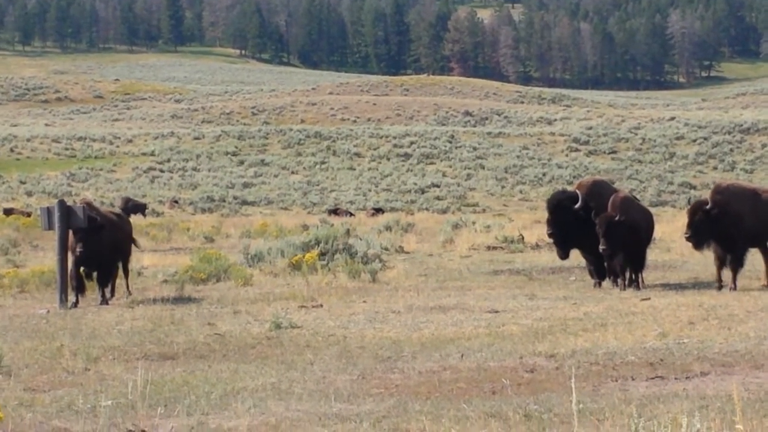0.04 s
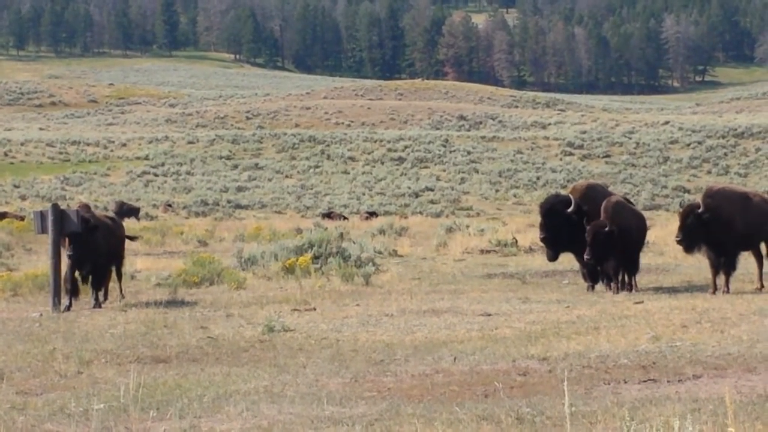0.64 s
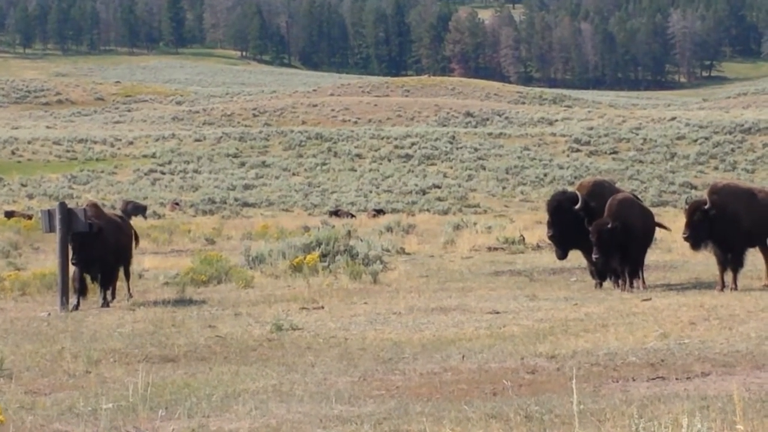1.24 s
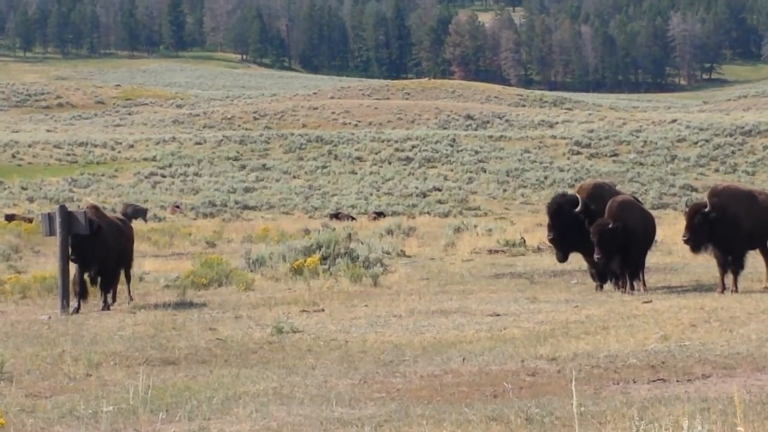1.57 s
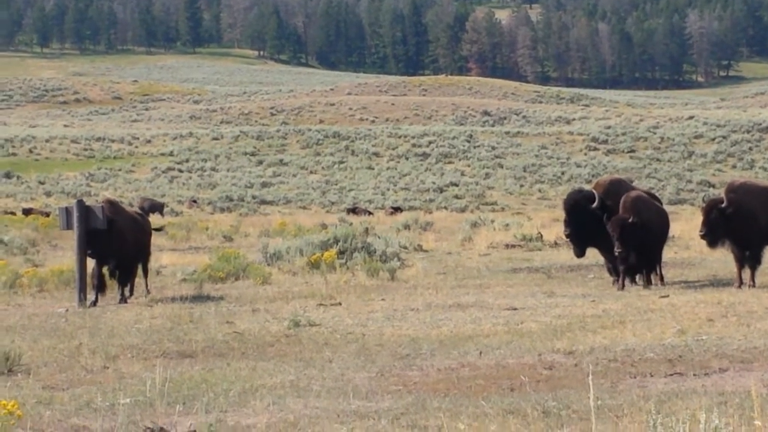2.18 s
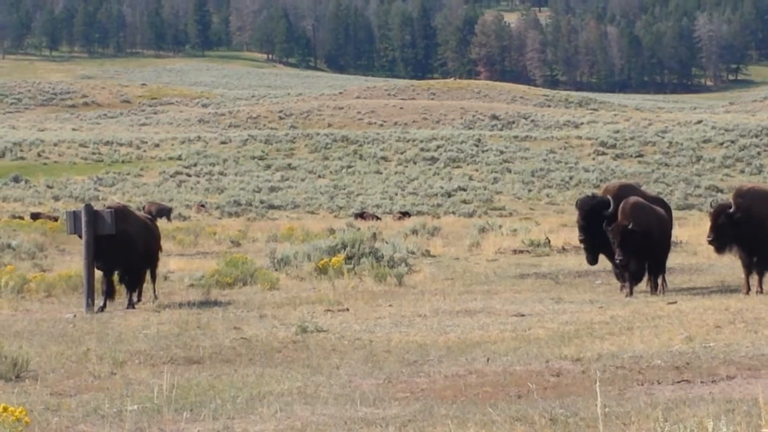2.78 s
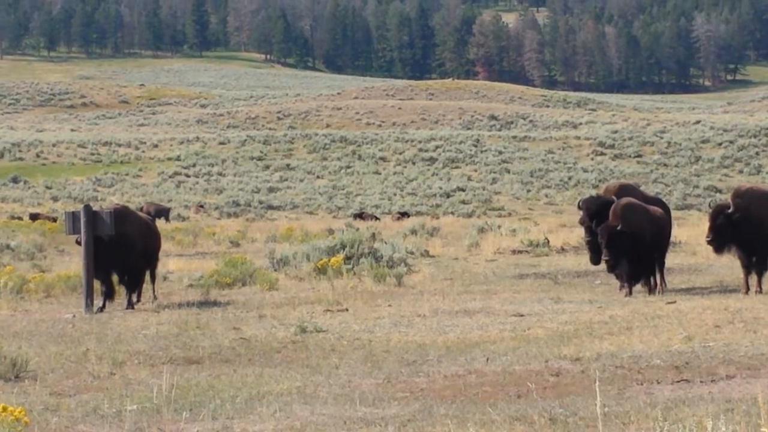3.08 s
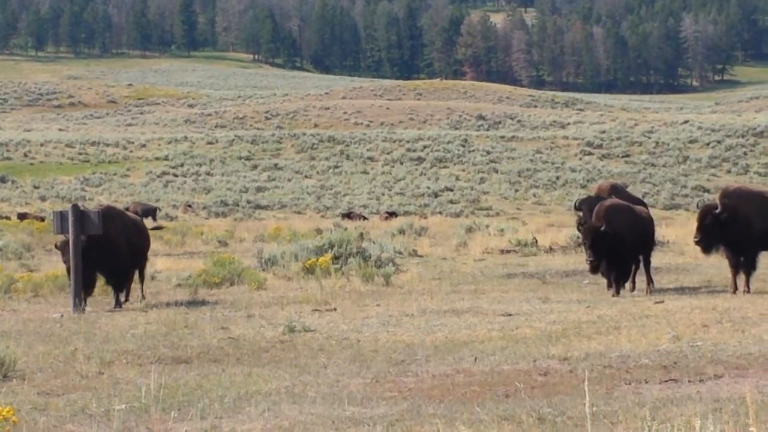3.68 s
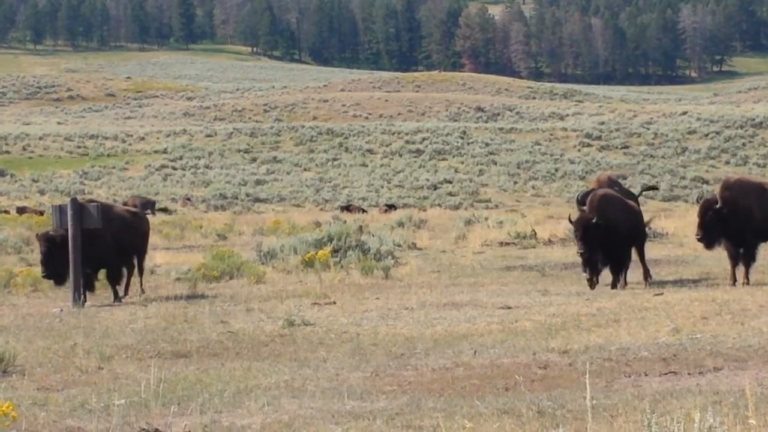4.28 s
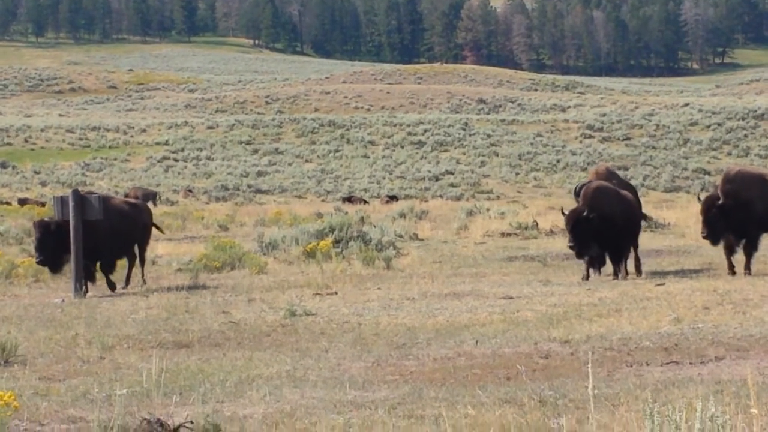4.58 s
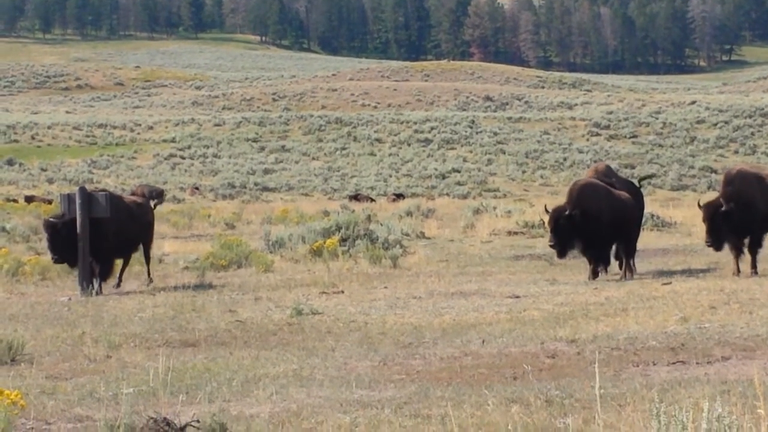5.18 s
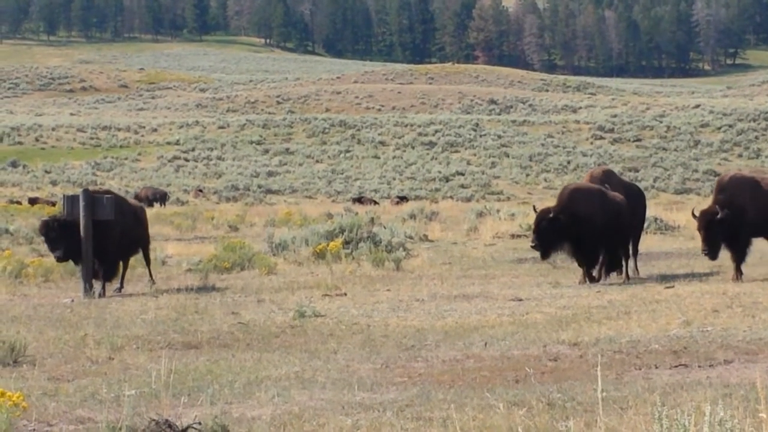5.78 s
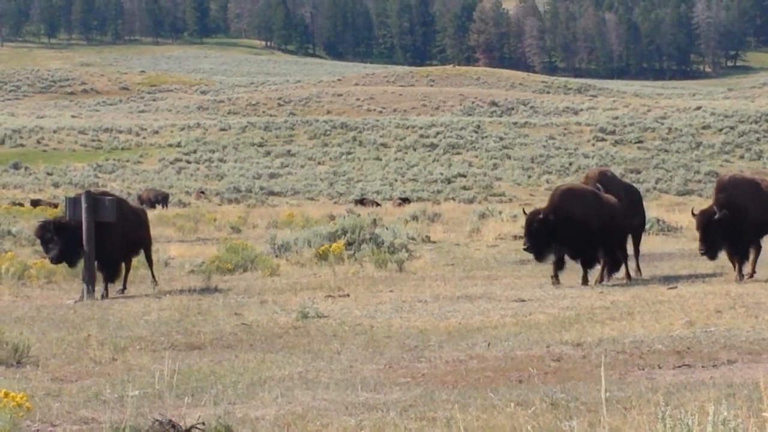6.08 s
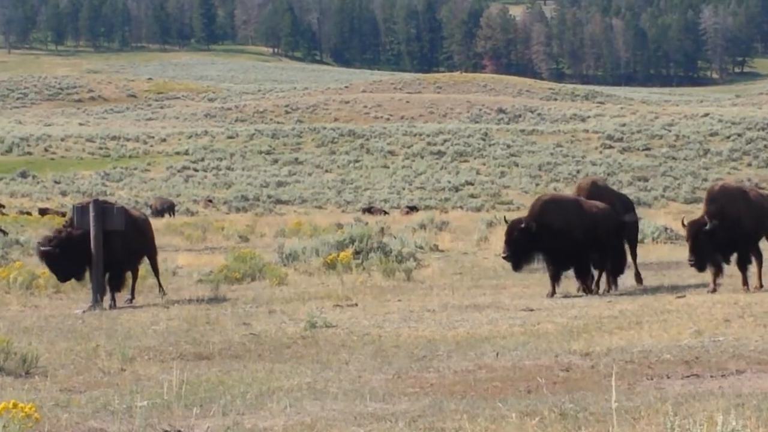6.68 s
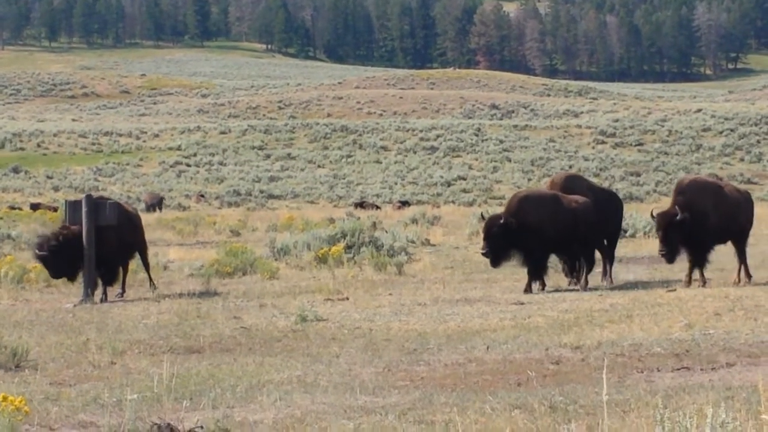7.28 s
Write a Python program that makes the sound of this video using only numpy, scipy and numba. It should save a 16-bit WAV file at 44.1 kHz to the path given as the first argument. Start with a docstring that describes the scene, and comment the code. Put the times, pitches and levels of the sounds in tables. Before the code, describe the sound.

Three hoarse, throaty bison bellows sound outdoors, with faint herd grumbles, small clicks and knocks, and a low rumble of air between them.

```python
"""Bison bulls bellow three times on an open plain, rough and rattling: their vocal folds slap shut
slowly, and each slap makes a long throat and the mouth ring. Wet clacks run through the second bellow.
A softer growl trails the first one, and the far herd grumbles in the pauses.
Dry ticks, dull knocks, one sharp snap and a short rustle sound close by,
over a faint rumble of air and the hiss and thin whine of a camera."""
import sys
import numpy as np
from scipy import signal
from scipy.fft import rfft, irfft
from scipy.io import wavfile
from scipy.ndimage import uniform_filter1d
from numba import njit

SR = 44100
rng = np.random.default_rng(int(sys.argv[2]) if len(sys.argv) > 2 else 0)


def materialize(psi):
    """Save the field psi as 16-bit PCM at rate SR to the path in sys.argv[1].

    A 1-D psi becomes a single channel; in a 2-D psi each row is a channel.
    """
    bounded = np.clip(np.atleast_2d(psi).T, -1, 1)
    quanta = np.round(bounded * 32767).astype(np.int16)
    wavfile.write(sys.argv[1], SR, quanta)


N = 328104
T = np.arange(N) / SR

# the bellows: start t/s, hardest strain t/s, end t/s, fade-in t/s, level/dB,
# throat note f/Hz (at the start, at the hardest strain, at the end),
# mouth level/dB (at first, once settled), rasp level/dB (at first, once settled)
BELLOWS = [(-0.015, 0.225, 0.59, 0.056, -37, 154, 192, 162, -22, -19.5, -34.5, -21.5),
           (2.712, 2.96, 3.306, 0.078, -29.5, 176, 215, 135.5, -19.5, -12, -27, -22),
           (5.524, 6.235, 6.9, 0.12, -26, 188, 216.7, 134, -4, -19, -40.5, -32.5)]
# how often the vocal folds slap, one list per bellow: t/s, f/Hz
SLAP_RATES = [
    [(0.024, 25), (0.064, 28.13), (0.205, 22.6), (0.56, 15.8)],
    [(2.712, 26.4), (2.833, 32.89), (2.966, 24.7), (3.3, 20.32)],
    [(5.524, 28.8), (5.661, 39.35), (5.981, 27.4), (6.283, 29.7), (6.494, 26.7), (6.9, 27.6)],
]
# notes the mouth rings at in each bellow: f/Hz, width/Hz, level/dB
FIRST_MOUTH = [(523, 32, 2.5), (696, 75, -5), (1010, 250, -5), (1176, 68, 0.5)]
SECOND_MOUTH = [(500, 60, -17), (638, 42, 9.5), (1044, 210, 2.5), (1190, 320, -8)]
THIRD_MOUTH = [(490, 88, -6.5), (597, 36.5, 10.5), (780, 93, -12), (930, 87, -3.5), (1090, 77, -10.5),
               (1370, 53, -8)]
# tone colour (how strong each frequency is) of each bellow's rasp: f/Hz, level/dB
FIRST_RASP = [(600, -15), (1300, -0.5), (1520, -0.5), (1870, 0), (2400, -4), (3000, -13), (3550, -5.5),
              (3950, -2.5), (4700, -7), (5500, -13), (6300, -20), (7500, -15), (14000, -33)]
SECOND_RASP = [(600, -14), (1300, 3.5), (1750, 1.5), (2130, 3), (2450, -5), (2680, 2), (3200, -5),
               (4000, -5.5), (4480, -4), (5100, -6.5), (5500, -28), (6400, -12.5), (14000, -31)]
THIRD_RASP = [(600, -26), (1400, -9), (1620, -16), (2120, 4), (2400, -1), (2850, -1.5), (3450, -0.5),
              (3720, 0), (4100, -9), (4500, -5), (5400, -11), (6250, -13), (7200, -17), (14000, -40)]
# moments when a bull eases off: t/s, half length/s, level/dB
EASINGS = [(0.346, 0.056, -3), (6.037, 0.095, -3)]
# wet clacks in the throat: t/s, level/dB, f/Hz
CLACKS = [(2.750, -38.5, 1320), (2.786, -46, 1300), (2.895, -44, 2580), (3.033, -33, 2010),
          (3.076, -36, 2044), (3.119, -36.5, 2130), (3.143, -40, 2700), (3.163, -32.5, 2001),
          (3.187, -36, 2180), (3.207, -38.5, 2020), (3.255, -46.5, 2170), (3.283, -54, 2190)]
# pushes of breath in the soft growl and in the far herd: start t/s, end t/s, level/dB
GROWL_PUSHES = [(0.5, 1.05, -55), (0.98, 1.6, -54.5), (1.54, 2.36, -55), (2.36, 2.72, -67)]
HERD_PUSHES = [(3.25, 3.62, -66), (3.88, 4.3, -70.5), (4.42, 4.7, -70), (4.66, 4.95, -65), (5.0, 5.22, -72),
               (5.41, 5.7, -59), (6.82, 7.1, -67), (7.1, 7.5, -72.5)]
# note the growling throat rings at: t/s, f/Hz
GROWL_THROAT = [(0.6, 193), (1.2, 172), (1.6, 191), (1.85, 164), (2.08, 108), (2.3, 151)]
# tone colours of the growl and the herd: f/Hz, level/dB
GROWL_COLOUR = [(50, -17), (85, 3.5), (125, -0.5), (187, 1), (215, -0.5), (250, 0.5), (320, -14.5),
                (520, -10.5), (800, -15), (1400, -28.5), (2200, -33), (5000, -34)]
HERD_COLOUR = [(50, -37), (90, 5), (140, 8), (230, 5), (320, -16), (520, -6.5), (1000, -36), (3000, -45)]
# notes that the snap and the ticks ring at: f/Hz, width/Hz, level/dB
SNAP_NOTES = [(504.3, 28, 11), (1048, 120, 1), (1245, 22, 3), (1630, 70, 2.5), (2165, 99, 6),
              (3365, 86, 1.5), (3951.5, 214, 1), (4336, 230, -1), (5140, 130, -5.5), (6030, 320, -2)]
TICK_NOTES = [(1230, 360, -3), (1608, 220, -6), (1980, 310, -4), (3210, 400, -1), (3910, 220, 2.5),
              (4600, 600, -33), (6000, 700, -27)]
# dry ticks: t/s, level/dB, number of clicks
TICKS = [(.297, -44, 1), (.400, -42, 1), (.469, -40.5, 2), (.701, -48, 1), (.721, -48, 3), (.757, -46.5, 3),
         (.802, -45.5, 3), (.854, -48.5, 3), (.902, -49, 3), (1.604, -50, 3), (1.682, -51, 2),
         (1.728, -52, 1), (1.967, -47.5, 2), (2.101, -45.5, 2), (2.279, -54, 1), (3.721, -61.5, 2),
         (4.278, -55.5, 1), (4.318, -56.5, 3), (6.935, -56, 2)]
# dull knocks: t/s, level/dB
KNOCKS = [(.415, -39.5), (1.604, -50.5), (1.682, -53.5), (2.478, -53), (3.063, -34.5), (3.126, -41)]
# a dry rustle: start t/s, end t/s, level/dB
RUSTLE = (7.32, 7.47, -69)
# how much louder the left side is than the right: f/Hz, level/dB
LEFT_OVER_RIGHT = [(60, -0.5), (110, 0), (200, 1), (370, -2.5), (680, 0), (1240, 5), (2280, -12.5),
                   (4180, 9), (7660, -12), (14000, 2)]
# tone colours of the rumbling air and the hiss: f/Hz, level/dB
AIR_COLOUR = [(12, -41), (20, 7.5), (38, -6.5), (71, -3), (154, -6), (245, -6), (278, -19), (326, -15),
              (356, -29), (376, -17.5), (664, -25.5), (712, -9), (914, -30), (1400, -34), (1820, -59),
              (3080, -120)]
HISS_COLOUR = [(500, 11), (1200, 0.5), (2200, 2), (3500, -1), (5000, -0.5), (6300, 2.5), (8000, -2.5),
               (11000, -1), (14500, -4.5)]
# tones of the camera's whine: start t/s, end t/s, f/Hz, level/dB
WHINE_TONES = [(2.55, 4.42, 11267, -81), (2.55, 4.42, 9317, -85), (2.55, 4.42, 5631, -90),
               (.95, 2.55, 6947, -85), (.95, 2.55, 10657, -90), (4.42, 7.44, 6947, -91),
               (4.42, 7.44, 10657, -93)]


def bellow(row, slap_rates, mouth_notes, rasp_colour, throat_width_hz, flap_db, rattle_db, rebound_db,
           breath_db, wheeze_db, crackle_s, chest_db, rasp_follows):
    """The vocal folds slap shut some 25 times a second, bounce back and flap at random in between."""
    start, _, end = row[:3]
    gain, strain, throat_hz, mouth_db, rasp_db = effort(row)
    during = (T >= start) & (T <= end)
    rate_hz = np.interp(T, *np.transpose(slap_rates))
    cycles_so_far = np.cumsum(rate_hz * during) / SR + rate_hz[0] * max(-start, 0)
    cycles = np.arange(int(cycles_so_far[-1]) + 1)
    slap_luck, crack_luck, rebound_luck = rng.standard_normal((80, 3))[:len(cycles)].T
    slap_times = np.interp(cycles, cycles_so_far[during], T[during])
    rebound_times = np.interp(cycles + .53, cycles_so_far[during], T[during])
    slaps = impulses(slap_times, undb(1.04 * slap_luck))
    cracks = impulses(slap_times, undb(1.9 * crack_luck))
    rebounds = impulses(rebound_times, undb(rebound_db + 2.7 * rebound_luck))
    flaps = (rng.random(N) < 220 / SR) * noise() * during
    # the long throat booms after each slap
    push = slaps + undb(flap_db) * flaps + 0.2 * rebounds
    boom = resonate(push, throat_hz, float(throat_width_hz))
    boom = resonate(boom, throat_hz, 115.0) + 0.05 * boom
    boom = cut(cut(boom, 238, "low"), 75.0, "high", order=4)
    # the chest thuds lower, and throbs faintly at the slap rate itself
    thud = ring(push, [(105.8, 11.7, 0)])
    thud = cut(cut(thud, 69.4, "high", order=6), 90, "low", order=4)
    throb = cut(cut(slaps, 57, "low", order=6), 22, "high")
    chest = unit(thud, during) + 0.19 * unit(throb, during)
    # breath rushes hardest just after each slap
    breath = noise() * (0.5 + fade(slaps, 0.015)) * np.sqrt(rate_hz / SR)
    # the mouth's notes follow the throat a little and never hold quite still
    stretch = (throat_hz / throat_hz[during].mean()) ** 0.13 * (1 + 0.025 * wander(18))
    rattle = cracks + undb(rattle_db) * flaps + rebounds + undb(breath_db) * breath
    mouth = ring(rattle, mouth_notes, stretch)
    mouth = cut(cut(mouth, 395, "high", order=3), 950, "low", order=4)
    # wet tissue crackles each time the folds close
    bursts = fade(cracks + rebounds + 0.17 * np.abs(flaps), crackle_s)
    crackle = noise() * fade(bursts, 0.00068)
    rasp = colour(unit(crackle, during) + undb(wheeze_db) * unit(breath, during), rasp_colour)
    rasp = undb(rasp_db) * unit(rasp, during) * strain ** rasp_follows
    voice = (steady(boom, 0.035) + undb(mouth_db) * steady(mouth, 0.12)) * easing()
    return (voice * strain + rasp + undb(chest_db) * chest) * gain


def effort(row, strain_db_per_hz=0.16, mouth_open_s=0.11, mouth_settle_s=0.27):
    """The harder the bull strains, the higher and louder its throat rings; its mouth opens and settles."""
    start, peak, end, attack_s, db, start_hz, peak_hz, end_hz = row[:8]
    mouth_start_db, mouth_settled_db, rasp_start_db, rasp_settled_db = row[8:]
    gain = undb(db) * envelope(start, end, attack_s, release_s=0.12, depth_db=19.5)
    slack = np.interp(T, [start, peak, end], [1, 0, 1]) ** 1.3  # the power rounds off the turn
    sag_hz = slack * (peak_hz - np.where(T < peak, start_hz, end_hz))
    strain = undb(-strain_db_per_hz * sag_hz)
    unsettled = np.exp(-np.maximum(T - start, 0) / mouth_settle_s)
    shut_db = np.interp(T, [start, start + mouth_open_s], [-12, 0])
    mouth_db = mouth_settled_db + unsettled * (mouth_start_db - mouth_settled_db) + shut_db
    rasp_db = rasp_settled_db + unsettled * (rasp_start_db - rasp_settled_db)
    return gain, strain, peak_hz - sag_hz, mouth_db, rasp_db


def easing():
    """The voice dips smoothly wherever a bull eases off."""
    return undb(sum(db * np.exp(-((T - s) / half_s) ** 2) for s, half_s, db in EASINGS))


def clacks(width_hz=190):
    """Wet tissue parts with a pop that rings briefly in the mouth."""
    sound = 0
    for s, db, hz in CLACKS:
        parting = ring(impulses([s], 1.), [(hz, 900, 0)])
        pop = ring(parting, [(hz, width_hz, 0), (hz / 2, width_hz, 2)])
        sound = sound + undb(db) * pop / np.abs(pop).max()
    return sound


def grumble(pushes, tone_colour, throat_hz, rate_hz, unevenness, breath_db, throat_width_hz, leak,
            attack_s, release_s, sag_db_per_s):
    """Soft, uneven slaps ring a throat, blurred by distance; each push swells, sags and dies away."""
    gain = 0
    for start, end, db in pushes:
        sagging = undb(db - sag_db_per_s * np.maximum(T - start, 0))
        gain = np.maximum(gain, sagging * envelope(start, end, attack_s, release_s, depth_db=7.5))
    gap_luck, size_luck = rng.standard_normal((400, 2)).T
    times = np.cumsum(np.exp(unevenness * gap_luck) / rate_hz)
    in_scene = times < T[-1]
    slaps = impulses(times[in_scene], undb(2 * size_luck[in_scene]))
    breath = noise() * fade(slaps, 0.043)
    source = unit(slaps) + undb(breath_db) * unit(breath)
    throat = resonate(source, throat_hz * np.ones(N), float(throat_width_hz)) + leak * source
    return steady(colour(throat, tone_colour), 0.081) * gain


def snap(at_s=6.6762, level_db=-22.5, sweep_s=0.0038):
    """A sharp snap that chirps downward, because its high notes start first."""
    sound = 0
    for hz, width, db in SNAP_NOTES:
        lag_s = sweep_s * max(1 - hz / 6500, 0)
        sound = sound + ring(impulses([at_s + lag_s], 1.), [(hz, width, db)])
    sound = cut(sound, 7130, "low", order=8)
    return sound / np.abs(sound).max() * undb(level_db)


def ticks(length=600):
    """Dry clicks, alone or in quick groups that get weaker; every click has its own pitch."""
    sound = np.zeros(N + SR)
    for s, db, count in TICKS:
        gaps_s = rng.uniform(0.005, 0.011, 4)
        stretches = np.exp(0.031 * rng.standard_normal(4))
        scrapes = rng.standard_normal((4, length)) * np.exp(-T[:length] / 0.0014)
        for k in range(count):
            click = ring(signal.unit_impulse(length) + 0.2 * scrapes[k], TICK_NOTES, stretches[k])
            start = int((s + gaps_s[:k].sum()) * SR)
            sound[start:start + length] += undb(db - 2.7 * k) * click / np.abs(click).max()
    return sound[:N]


def knocks():
    """Soft bumps make something hollow ring."""
    times, db = np.transpose(KNOCKS)
    hollow = ring(signal.unit_impulse(3000), [(499, 64, -7), (708, 40, -16.5)])
    hollow = cut(hollow, 510, "low")
    return signal.fftconvolve(impulses(times, undb(db)), hollow / np.abs(hollow).max())[:N]


def rustle(clicks_per_s=900):
    """A crowd of tiny clicks that ring mostly on one bright note."""
    start, end, db = RUSTLE
    clicks = (rng.random(N) < clicks_per_s / SR) * noise()
    gain = undb(db) * envelope(start, end, attack_s=0.023, release_s=0.043, depth_db=20)
    return unit(ring(clicks, TICK_NOTES) + ring(clicks, [(3880, 190, 11)])) * gain


def surroundings(x):
    """Nearby surfaces scatter the highs differently to each side; the plain adds a faint, dull echo."""
    t = T[:SR // 2]

    def tail(hz, kind, seconds):
        return cut(rng.standard_normal(len(t)), hz, kind) * np.exp(-t / seconds) * np.sqrt(2 / (seconds * SR))

    sides = []
    for sign in (1, -1):
        near = undb(-5) * tail(2000, "high", seconds=0.0097)
        far = undb(-30) * tail(1300, "low", seconds=0.11)
        echoes = signal.fftconvolve(x, near + far)[:N]
        sides.append(colour(x + echoes, [(hz, sign * db / 2) for hz, db in LEFT_OVER_RIGHT]))
    return np.array(sides)


def air(level_db=-69.5):
    """The air rumbles low and swells gently, mostly the same on both sides."""
    swell = undb(1.05 * wander(3.07))
    shared = unit(colour(noise(), AIR_COLOUR)) * swell
    return undb(level_db) * cut(shared + 0.27 * stereo_noise(AIR_COLOUR), 930, "low")


def hiss(sound, full_db=-56, dip_db=14.5, quiet_db=-72.5, loud_db=-34, follow_s=0.07):
    """The camera hisses; its noise reducer lets more hiss through the louder the sound is."""
    power = uniform_filter1d(np.mean(sound ** 2, axis=0), size=2205)
    sound_db = 10 * np.log10(np.abs(power) + 1e-18)
    opening = np.interp(sound_db, [quiet_db, loud_db], [0, 1])
    opening = opening[0] + fade(opening - opening[0], follow_s) / (follow_s * SR)
    return stereo_noise(HISS_COLOUR) * undb(full_db - dip_db * (1 - opening))


def whine():
    """The camera gives off thin, fluttering tones that switch on and off."""
    flutter = undb(1.9 * wander(27) - 4.0)
    tones = 0
    for start, end, hz, db in WHINE_TONES:
        tone = np.sqrt(2) * np.sin(2 * np.pi * hz * T + 0.5 * wander(14))
        tones = tones + undb(db) * tone * gate(start, end)
    return flutter * tones


def undb(db):
    """Turn decibels into a number to multiply by."""
    return 10 ** (np.asarray(db) / 20)


def unit(x, where=slice(None)):
    """Scale a sound so that its average strength (rms) is 1 in the chosen part."""
    return x / np.sqrt(np.mean(x[..., where] ** 2) + 1e-18)


def steady(x, seconds):
    """Even out the loudness, so that a level curve can shape it afterwards."""
    size = int(seconds * SR)
    power = uniform_filter1d(uniform_filter1d(x ** 2, size), size)
    return x / np.sqrt(np.abs(power) + power.max() / 100)


def colour(x, points, size=4096):
    """Make each frequency louder or softer, along a curve of (f/Hz, level/dB) points."""
    hz, db = np.transpose(points)
    curve_db = np.interp(np.log(np.fft.rfftfreq(size, 1 / SR) + 1), np.log(hz), db)
    cepstrum = irfft(np.log(undb(curve_db)))
    # folding the second half onto the first makes the filter ring only after a sound, never before
    cepstrum[1:size // 2] *= 2
    cepstrum[size // 2 + 1:] = 0
    return signal.fftconvolve(x, irfft(np.exp(rfft(cepstrum))))[:len(x)]


@njit
def resonate(x, hz, width):
    """Ring at one note that may glide; the smaller the width, the longer it rings."""
    y, band, low = np.empty(len(x)), 0., 0.
    for i in range(len(x)):
        tuning, damping = np.tan(np.pi * hz[i] / SR), width / hz[i]
        swing = (band + tuning * (x[i] + 1e-18 - low)) / (1 + tuning * (tuning + damping))
        band, low = 2 * swing - band, low + 2 * tuning * swing
        y[i] = damping * swing
    return y


def ring(x, notes, stretch=1):
    """Ring at several notes at once; stretch moves them all up or down."""
    return sum(undb(db) * resonate(x, np.full(len(x), float(hz)) * stretch, float(width))
               for hz, width, db in notes)


def cut(x, hz, kind, order=2):
    """Keep the "low" or the "high" side of a frequency."""
    return signal.sosfilt(signal.butter(order, hz, kind, fs=SR, output="sos"), x)


def noise():
    """White noise: all frequencies equally strong."""
    return rng.standard_normal(N)


def stereo_noise(tone_colour):
    """Separate coloured noise for left and right."""
    return np.array([unit(colour(noise(), tone_colour)) for _ in range(2)])


def wander(rate):
    """Glide to a new random value, rate times a second."""
    step = int(SR / rate)
    return 1.35 * uniform_filter1d(np.repeat(rng.standard_normal(N // step + 1), step), step)[:N]


def impulses(times, sizes):
    """One tiny kick at each time."""
    samples = np.clip(np.asarray(times) * SR, 0, N - 1).astype(int)
    return np.bincount(samples, sizes * np.ones(len(times)), N)


def fade(x, seconds):
    """Give each kick a tail that dies away."""
    return signal.lfilter([1], [1, -np.exp(-1 / (seconds * SR))], x + 1e-18)


def gate(start, end):
    """On from start to end, with soft edges."""
    return uniform_filter1d(((T >= start - .01) & (T <= end + .01)) * 1., size=440)


def envelope(start, end, attack_s, release_s, depth_db):
    """Rise by depth_db over attack_s, hold, and fall as far over release_s."""
    ramp = np.clip(np.minimum((T - start) / attack_s, (end - T) / release_s), 0, 1)
    return gate(start, end) * undb(depth_db * (ramp - 1))


def scene():
    """Mix the bellows, the growl, the herd and the small close noises with air, hiss and whine."""
    first, second, third = zip(BELLOWS, SLAP_RATES)
    bulls = bellow(*first, FIRST_MOUTH, FIRST_RASP, throat_width_hz=24.0,
                   flap_db=-14, rattle_db=-10.5, rebound_db=-12, breath_db=1.0, wheeze_db=-2.5,
                   crackle_s=0.0014, chest_db=-14.0, rasp_follows=0.18)
    bulls += bellow(*second, SECOND_MOUTH, SECOND_RASP, throat_width_hz=23.2,
                    flap_db=-19, rattle_db=-13.5, rebound_db=-12.5, breath_db=-2.5, wheeze_db=-2.5,
                    crackle_s=0.0018, chest_db=-19.5, rasp_follows=0.33)
    bulls += bellow(*third, THIRD_MOUTH, THIRD_RASP, throat_width_hz=27.8,
                    flap_db=-18, rattle_db=-8.5, rebound_db=-40, breath_db=-3.5, wheeze_db=-0.5,
                    crackle_s=0.0022, chest_db=-21.5, rasp_follows=0.93)
    growl_hz = np.interp(T, *np.transpose(GROWL_THROAT))
    growl = grumble(GROWL_PUSHES, GROWL_COLOUR, growl_hz, rate_hz=29, unevenness=0.16, breath_db=4,
                    throat_width_hz=14, leak=0.18, attack_s=0.045, release_s=0.12, sag_db_per_s=8.5)
    herd = grumble(HERD_PUSHES, HERD_COLOUR, throat_hz=154, rate_hz=18, unevenness=0.33, breath_db=2,
                   throat_width_hz=42, leak=0.5, attack_s=0.11, release_s=0.2, sag_db_per_s=9)
    animals = bulls + clacks() + growl + herd
    sound = surroundings(animals + ticks() + rustle() + snap() + knocks()) + air()
    return sound + hiss(sound) + whine()


def record(dry, top_hz=14550):
    """Cut away the very highest frequencies."""
    return signal.sosfilt(signal.ellip(10, .2, 70, top_hz, fs=SR, output="sos"), dry)


dry = scene()
out = record(dry)
materialize(out)
```